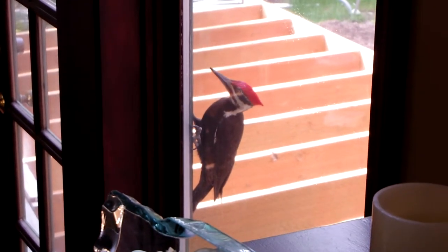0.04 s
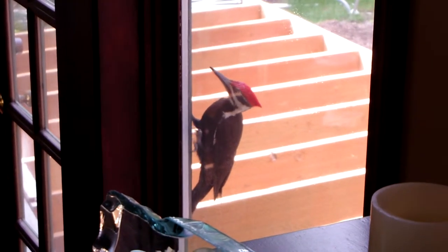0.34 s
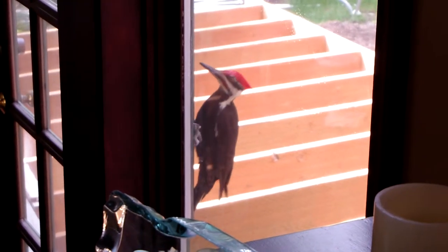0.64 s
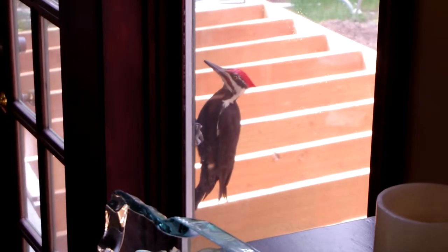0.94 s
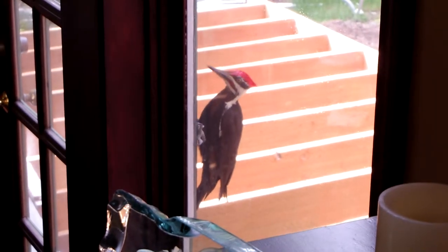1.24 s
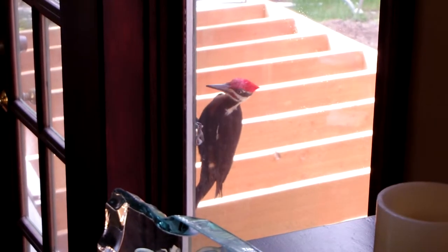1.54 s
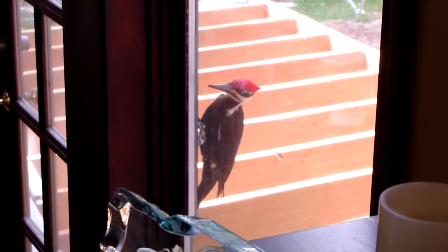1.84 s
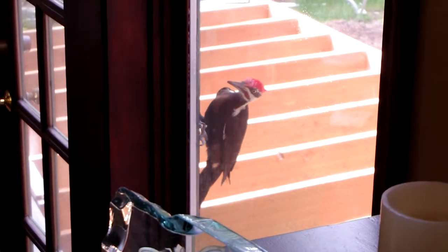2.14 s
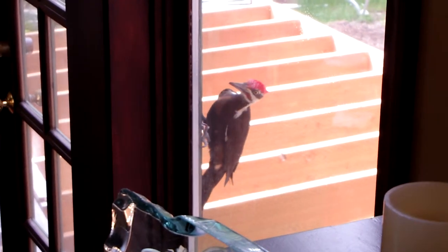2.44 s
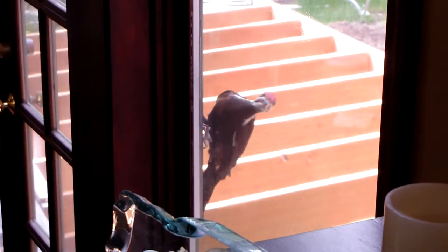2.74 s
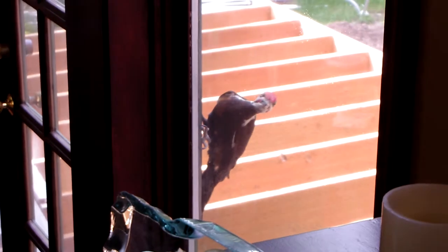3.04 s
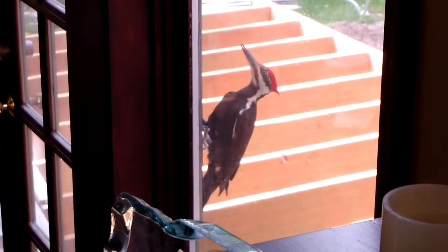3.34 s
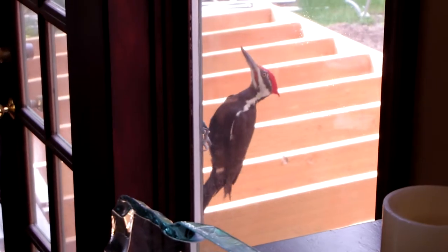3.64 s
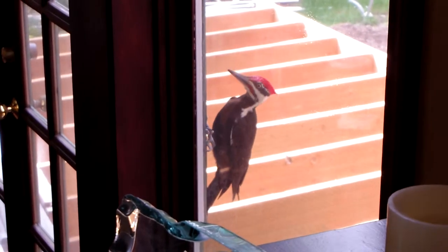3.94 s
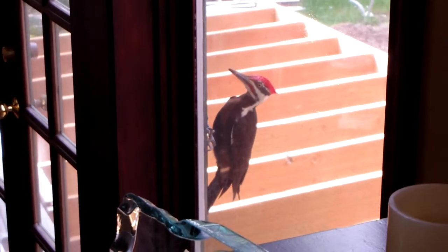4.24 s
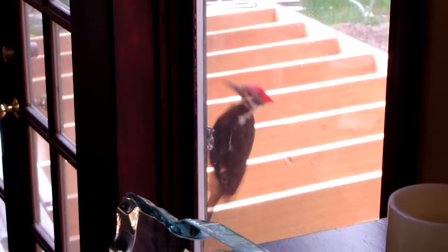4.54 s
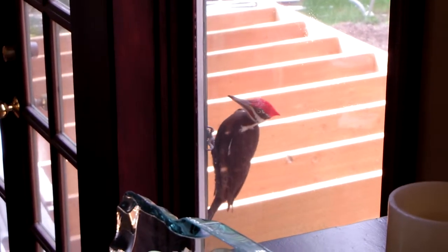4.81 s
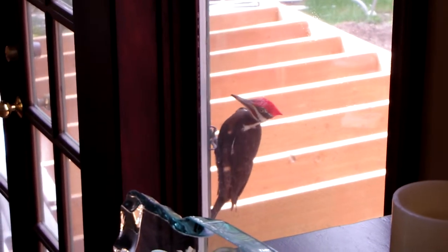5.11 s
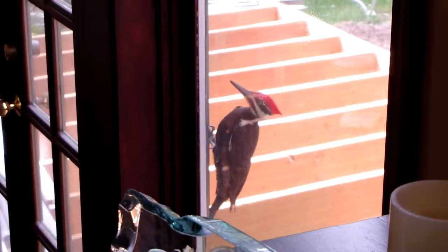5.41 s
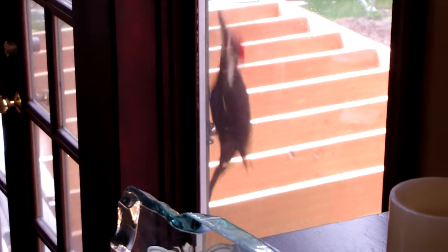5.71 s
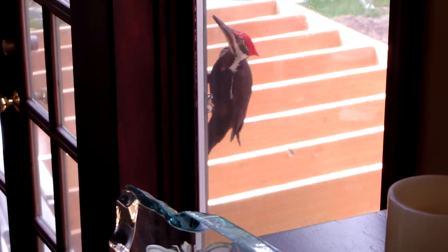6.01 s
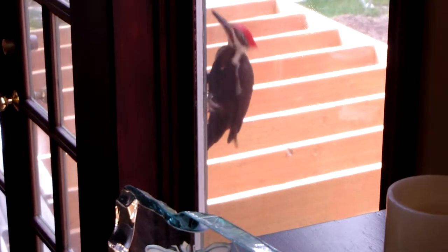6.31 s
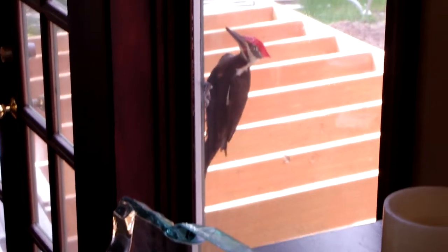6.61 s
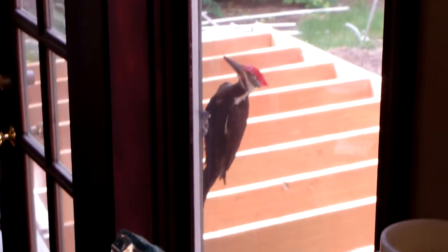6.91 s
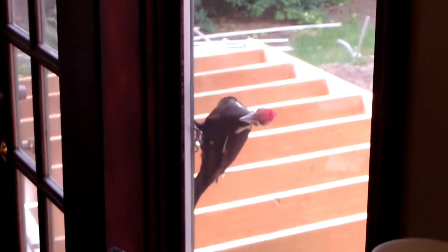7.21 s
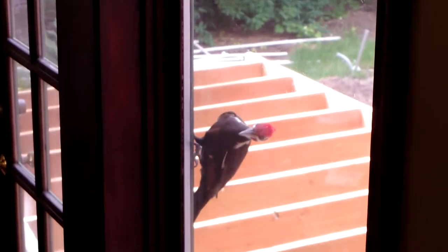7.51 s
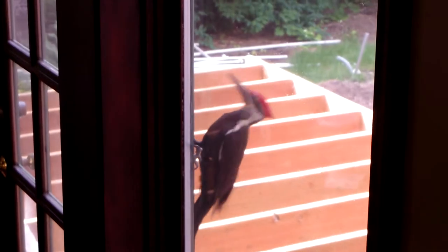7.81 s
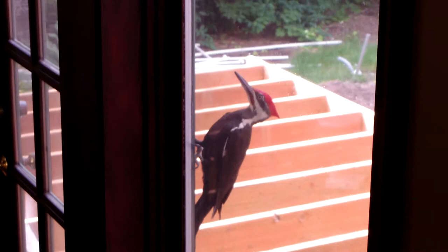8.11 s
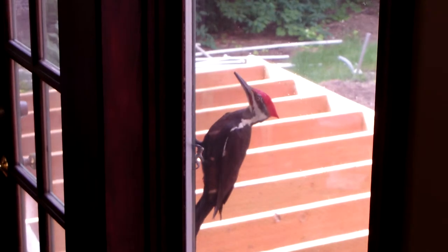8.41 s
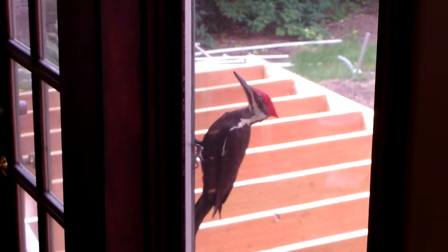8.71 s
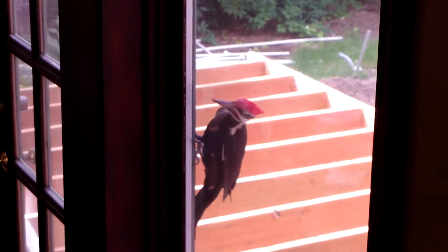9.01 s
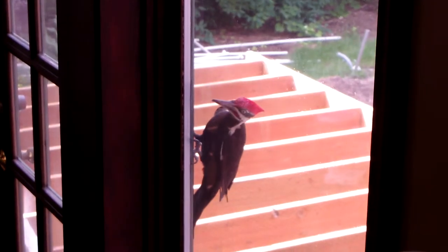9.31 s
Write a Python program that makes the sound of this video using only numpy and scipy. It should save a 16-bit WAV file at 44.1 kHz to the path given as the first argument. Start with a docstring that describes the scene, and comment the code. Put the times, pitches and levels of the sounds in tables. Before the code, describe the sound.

A woodpecker's claws click and scuff faintly on a door frame, then its bill gives one firm, ringing knock, heard from a quiet room.

```python
"""A large woodpecker climbs the outside of a door frame, heard from a quiet room.
Its claws click on the hard trim and squeak as they slip; each hop bumps the door and scuffs it.
The bill gives one light tap early on, and at last a firm knock that sets frame and glass ringing.
The room answers each click with a soft tail. Underneath lies a bed of air, mains hum and hiss."""
import sys
import numpy as np
from scipy import signal
from scipy.fft import irfft, next_fast_len
from scipy.io import wavfile

SR = 44100
rng = np.random.default_rng(int(sys.argv[2]) if len(sys.argv) > 2 else 0)


def digitize_waveform(pressure):
    """Quantize a signal to 16-bit integers and store it at the path in sys.argv[1].

    Rows of a 2-D input are taken as channels; values are limited to [-1, 1].
    """
    field = np.atleast_2d(pressure).T
    bounded = np.clip(field, -1, 1)
    quanta = np.round(bounded * 32767).astype(np.int16)
    wavfile.write(sys.argv[1], SR, quanta)


N = 421155
TIME = np.arange(N) / SR
AFTER = np.arange(SR) / SR  # the second after a contact
SIDE = np.array([[1], [-1]])  # adds to the left, subtracts from the right

# colour of the room air: f/Hz, level/dB
AIR_COLOUR = [(15, 0), (30, -0.5), (55, 1.5), (85, -6), (125, -4), (170, -5.5), (250, -4), (400, -3.5),
              (750, -4.5), (1500, -5.5), (3200, -8.5), (7000, -13.5), (15500, -20)]
# colour of the hiss: f/Hz, level/dB
HISS_COLOUR = [(15, 2), (45, 1), (110, -0.5), (250, -5.5), (600, -10), (1400, -14), (4000, -16.5),
               (8000, -19.5), (15500, -23)]
# mains hum and a thin electrical whine: f/Hz, level/dB
HUM_TONES = [(119.6, -72.5), (14384, -92)]

# hops up the frame, one foot landing after the other:
# t/s, first claw/dB, claw pitch/Hz, hind claw lag/s, second foot lag/s, door bump/dB, scuff/dB
HOPS = [(0.7114, -27.5, 5040, 0.0039, 0.031, -65, -58.5), (5.9691, -22, 4900, .0024, .0252, -49.5, -47),
        (6.5165, -25.5, 4850, .0065, .0315, -53.5, -52)]
# shifts of the bird's weight: t/s, door bump/dB, scuff/dB, swell/s
WEIGHT_SHIFTS = [(0.50, -60, -63, 0.016), (0.767, -52.5, -81, 0.01), (2.08, -56, -58, 0.008),
                 (2.44, -63, -75, 0.006), (3.412, -62, -68, 0.005), (3.72, -62.5, -61, 0.16),
                 (4.70, -64, -63, 0.013), (5.868, -54, -57.5, 0.065), (7.242, -62, -62, 0.0068)]
# colour of the door's low bump: f/Hz, level/dB
BUMP_COLOUR = [(20, -12), (50, -15), (85, 1.5), (115, -2.5), (140, -13), (180, -3), (250, -17.5),
               (500, -41), (1500, -42)]
# colour of scuffing feet and feathers: f/Hz, level/dB
SCUFF_COLOUR = [(60, -7), (200, 0), (350, 9), (500, 2.5), (700, 5.5), (1050, 2.5), (1600, -2.5), (2600, -9),
                (5000, -6.5), (8000, -22), (15000, -41)]

# a claw tip slipping until it catches at t: t/s, level/dB, f/Hz, bandwidth/Hz, rise/s
CLAW_SLIPS = [(0.495, -63, 10300, 300, 0.004), (0.746, -60, 10300, 400, 0.002),
              (0.755, -59, 12000, 3000, 0.002), (3.832, -63, 5750, 280, 0.04)]
# light touches of a claw feeling for a hold: t/s, level/dB
CLAW_TOUCHES = [(0.4892, -51), (0.498, -47), (0.518, -45.5), (2.437, -55), (3.829, -51), (4.702, -52),
                (5.9357, -49), (6.4785, -52)]
# modes of the hard trim: f/Hz, level/dB, t60/s
TRIM_MODES = [(4070, -10.5, 0.016), (4390, -2.5, 0.0096), (4830, -1.5, 0.008), (5044, -1.5, 0.0074),
              (5760, -13.5, 0.012), (6600, -16, 0.008)]
# colour of a tip's gritty scratch: f/Hz, level/dB
SCRATCH_COLOUR = [(300, -24), (2000, 2), (3200, 9), (3900, 15), (5300, 6), (6300, 7), (7500, -9),
                  (9000, -12), (10400, -12), (15000, -26)]
# colour of a click as the room receives it from all directions: multiple of its pitch, level/dB
SPRAY_COLOUR = [(.1, -29), (.5, -11.5), (.68, -13), (.82, -1.5), (1, 1), (1.13, -4), (1.3, -11),
                (1.55, -22), (3, -39)]

# blows of the bill: t/s, level/dB, low cut/Hz, tip click/dB
BILL_BLOWS = [(2.076, -24, 570, -45), (9.1363, 2, 28, -30)]
# modes of frame and glass: f/Hz, level/dB, t60/s
FRAME_MODES = [(55.6, -43, 0.5), (82, -38, .35), (120, -37, 0.21), (145.5, -48, 0.53), (191, -44, 0.64),
               (241, -41, 0.48), (296, -37, 0.49), (334, -38, .75), (357, -33, .8), (391, -33, .7),
               (478, -35, .85), (520, -42, .6), (559, -38, .6), (591, -40, .55), (620, -38, .65),
               (655, -39, .65), (722, -37, .7), (744, -39.5, 0.77), (780, -52, 0.73), (820, -50, 0.52),
               (835, -42.5, 0.71), (890, -45, 0.91), (1040, -48, 0.36), (1055, -53, 0.71),
               (1175, -62, 0.36), (1370, -52, 0.59), (1533, -50, 0.5)]
# colour of the crowd of weaker wall and room modes: f/Hz, level/dB
WALL_COLOUR = [(25, -26), (55, -9), (200, -9.5), (370, 0), (700, -1.5), (1000, -6), (1400, -16.5),
               (1850, -21), (2400, -50), (3500, -67)]


def undb(db):
    """Decibels to gain."""
    return 10 ** (np.asarray(db) / 20)


def noise(colour, size):
    """Noise of unit rms, shaped by points of f/Hz, level/dB."""
    hz, db = np.transpose(colour)
    length = next_fast_len(size)
    freqs = np.maximum(np.fft.rfftfreq(length, 1 / SR), 1)
    gain = undb(np.interp(np.log(freqs), np.log(hz), db))
    x = irfft(gain * np.exp(2j * np.pi * rng.random(len(freqs))), length)[:size]
    return x / x.std()


def fade(t60):
    """A decay that falls 60 dB in t60 seconds."""
    return np.exp(-np.log(1000) * AFTER / t60)


def swell(seconds):
    """A smooth attack from silence to full level."""
    return 1 - np.exp(-(AFTER / seconds) ** 2)


def add(track, start, sound):
    """Mix a sound into a track at a time in seconds."""
    i = int(start * SR)
    track[..., i:i + sound.shape[-1]] += sound[..., :N - i]


def pan(left_db):
    """Gains of the two sides for a left-minus-right level."""
    return undb(SIDE * left_db / 2)


def room_tone(air_db=-59, hiss_db=-64):
    """The bed: steady air and electrical hum in the centre, a separate hiss on each side."""
    hiss = np.array([noise(HISS_COLOUR, N) for _ in range(2)])
    hum = sum(undb(db) * np.sqrt(2) * np.sin(2 * np.pi * hz * TIME) for hz, db in HUM_TONES)
    return undb(air_db) * noise(AIR_COLOUR, N) + undb(hiss_db) * hiss + hum


def pushes(landing_swell_s=0.002, landing_fade_s=0.1, shift_fade_s=0.047):
    """The body lands abruptly and shifts gently: t/s, door bump/dB, scuff/dB, swell/s, fade/s."""
    for start, *_, bump_db, scuff_db in HOPS:
        yield start, bump_db, scuff_db, landing_swell_s, landing_fade_s
    for start, bump_db, scuff_db, swell_s in WEIGHT_SHIFTS:
        yield start, bump_db, scuff_db, swell_s, shift_fade_s


def bumps_and_scuffs(width=0.13, left_db=1):
    """The bird's weight bumps the door while its feet and tail feathers scuff the frame."""
    track = np.zeros((2, N))
    for start, bump_db, scuff_db, swell_s, fade_s in pushes():
        push = swell(swell_s) * np.exp(-AFTER / fade_s)
        mid, side = (undb(bump_db) * noise(BUMP_COLOUR, SR) + undb(scuff_db) * noise(SCUFF_COLOUR, SR)
                     for _ in range(2))
        add(track, start, push / push.max() * (mid + width * side * SIDE))
    return pan(left_db) * track


def claw_squeaks(fall_s=0.0054, left_db=-3):
    """A slipping claw squeaks thinly, growing until it catches."""
    track = np.zeros(N)
    for catch, db, hz, width, rise_s in CLAW_SLIPS:
        band = [(hz - 2 * width, -60), (hz - width / 2, 0), (hz + width / 2, 0), (hz + 2 * width, -60)]
        envelope = np.exp(-np.abs(TIME - catch) / np.where(TIME < catch, rise_s, fall_s))
        track += undb(db) * noise(band, N) * envelope
    return pan(left_db) * track


def contacts(second_foot_db=-33, hind_db=-9, hind_ratio=0.81, grip_t60=0.017, touch_hz=4700, bill_hz=5700):
    """Each claw or bill tip on the trim: t/s, level/dB, f/Hz, scratch against ring/dB, scratch t60/s."""
    for start, db, hz, hind_lag, foot_lag, _, _ in HOPS:
        biting_foot = (start, db, -12.5)  # loaded, it bites at once with little scratch
        skidding_foot = (start + foot_lag, second_foot_db, -7)  # skids a little before it holds
        for lands, foot_db, scratch_db in (biting_foot, skidding_foot):
            # front claws grip first, then the softer, lower hind claws
            yield lands, foot_db, hz, scratch_db, grip_t60
            yield lands + hind_lag, foot_db + hind_db, hz * hind_ratio, scratch_db, grip_t60
    for start, db in CLAW_TOUCHES:
        yield start, db, touch_hz, -8.5, 0.035  # a longer scrape
    for start, _, _, tip_db in BILL_BLOWS:
        yield start, tip_db, bill_hz, -32, 0.011  # a clean tick


def click_reverb(room_db=-23, room_t60=0.74, wall_s=0.032, wall_gain=0.2, left_db=-6):
    """The room answers every click with a diffuse spray that lifts as the far wall's echo returns."""
    track = np.zeros((2, N))
    wall_echo = wall_gain * np.exp(-((AFTER - wall_s) / 0.004) ** 2)
    arrival = swell(0.0071) * (1 + wall_echo)
    for start, db, centre_hz, _, _ in contacts():
        colour = [(multiple * centre_hz, band_db) for multiple, band_db in SPRAY_COLOUR]
        spray = noise(colour, SR) + noise(colour, SR) * SIDE
        tail = fade(room_t60 * 4800 / centre_hz)  # higher clicks are absorbed sooner
        add(track, start, undb(db + room_db) * arrival * tail * spray)
    return pan(left_db) * track


def recess_echoes(track, t60=0.014, width=0.47):
    """The door recess throws back a mono track as dense, close stereo echoes."""
    mid, side = rng.standard_normal((2, SR)) * swell(0.00055) * fade(t60)
    response = mid + width * side * SIDE
    response /= np.sqrt(np.sum(response ** 2) / 2)
    return signal.fftconvolve(track[None], response, axes=1)[:, :N]


def trim_clicks(focus_hz=1200, rise_s=0.00048, low_cut_hz=3850, recess_db=-5, left_db=-8.5):
    """Each claw or bill tip rings the hard trim for a few milliseconds, with a gritty scratch on top."""
    track = np.zeros(N)
    # the narrow trim gives off little below its modes
    radiation = signal.butter(6, low_cut_hz, "high", fs=SR, output="sos")
    for start, db, centre_hz, scratch_db, scratch_t60 in contacts():
        ring = np.zeros(SR)
        for hz, mode_db, t60 in TRIM_MODES:
            # where and how the tip lands decides which modes speak
            drive = np.exp(-((hz - centre_hz) / focus_hz) ** 2 / 2)
            ring += undb(mode_db) * drive * np.sin(2 * np.pi * hz * AFTER) * fade(t60)
        ring = signal.sosfilt(radiation, ring * swell(rise_s))
        scratch = undb(scratch_db) * swell(0.00086) * fade(scratch_t60) * noise(SCRATCH_COLOUR, SR)
        add(track, start, undb(db) * (ring / np.abs(ring).max() + scratch))
    return pan(left_db) * (track + undb(recess_db) * recess_echoes(track))


def frame_ring(blur=3.9, rise_s=0.0032):
    """Frame and glass ring; each mode arrives by ever more paths through the room, so its phase wanders."""
    wander = blur * np.cumsum(rng.standard_normal((len(FRAME_MODES), SR)), axis=1) / np.sqrt(SR)
    ring = np.zeros(SR)
    for k, (hz, db, t60) in enumerate(FRAME_MODES):
        sign = (-1) ** k  # alternating signs soften the attack, so the ring blooms just after the knock
        ring += sign * undb(db) * np.sin(2 * np.pi * hz * AFTER + wander[k]) * fade(t60)
    return ring * swell(rise_s)


def bill_knocks(thud_hz=600, thud_db=-19, ring_db=-1.5, early_db=-36.5, late_db=-38, left_db=1.3):
    """The bill lands with a dead wooden thud that blooms into the modes of frame, glass and room."""
    thud = undb(thud_db) * np.sin(2 * np.pi * thud_hz * AFTER) * fade(t60=0.025) * swell(0.0006)
    ring = undb(ring_db) * frame_ring()
    bloom = swell(0.0017) * (undb(early_db) * fade(t60=0.22) + undb(late_db) * fade(t60=1.0))
    track = np.zeros((2, N))
    for start, db, low_cut_hz, _ in BILL_BLOWS:
        wall = noise(WALL_COLOUR, SR) + 0.27 * noise(WALL_COLOUR, SR) * SIDE
        knock = thud + ring + bloom * wall
        low_cut = signal.butter(2, low_cut_hz, "high", fs=SR, output="sos")  # thins the light tap
        add(track, start, undb(db) * signal.sosfilt(low_cut, knock))
    return pan(left_db) * track


def scene():
    """The bird on the frame, over the quiet of the room."""
    bird = trim_clicks() + click_reverb() + claw_squeaks() + bill_knocks() + bumps_and_scuffs()
    return bird + room_tone()


def record(dry, top_hz=15800):
    """A steep low-pass shaves off the top of the treble."""
    return signal.sosfilt(signal.ellip(10, .1, 70, top_hz, fs=SR, output="sos"), dry)


dry = scene()
out = record(dry)
digitize_waveform(out)
```